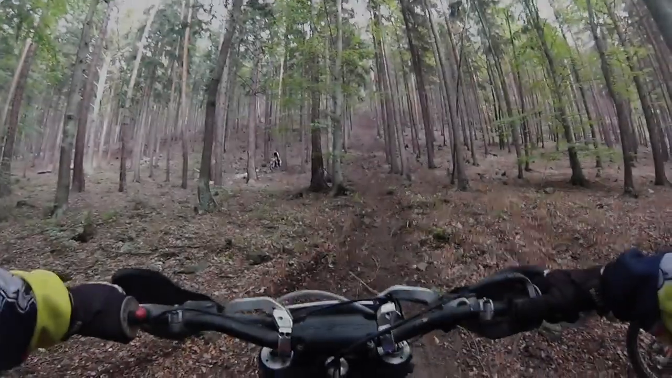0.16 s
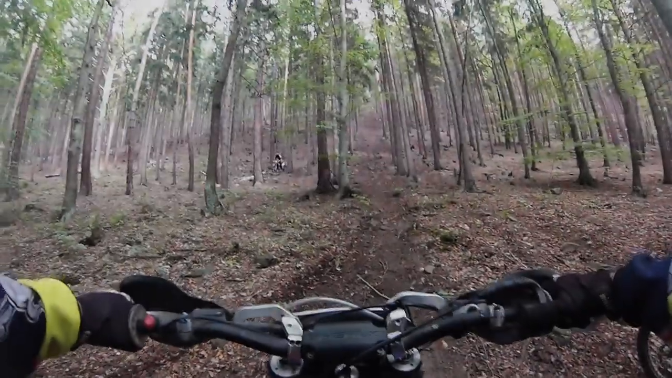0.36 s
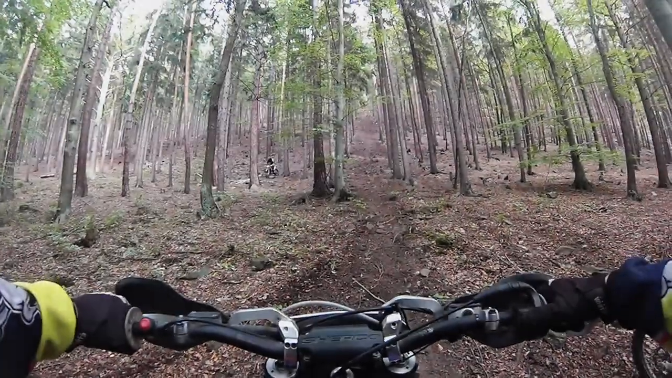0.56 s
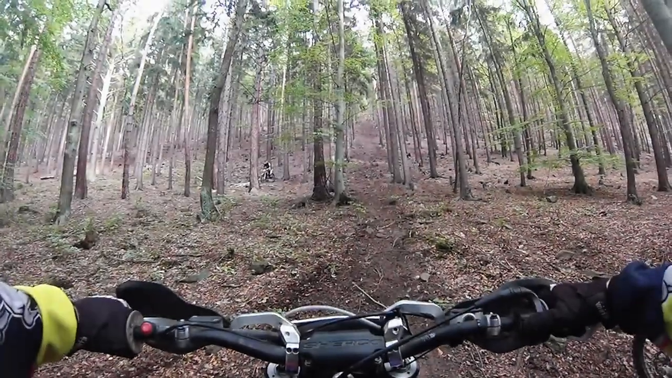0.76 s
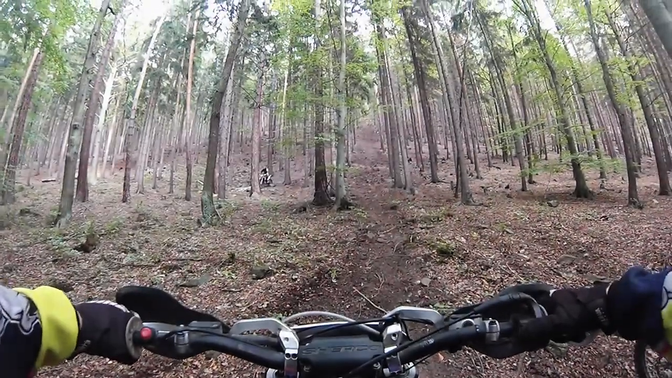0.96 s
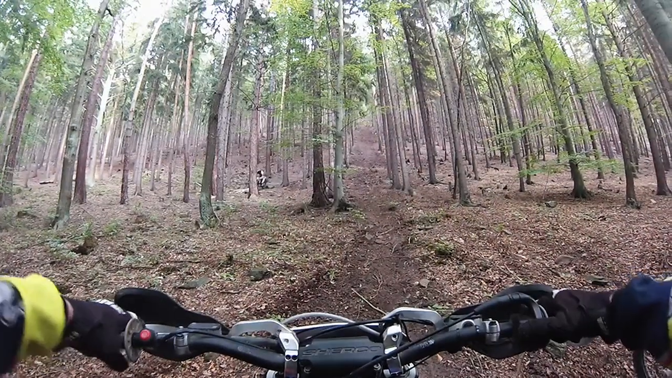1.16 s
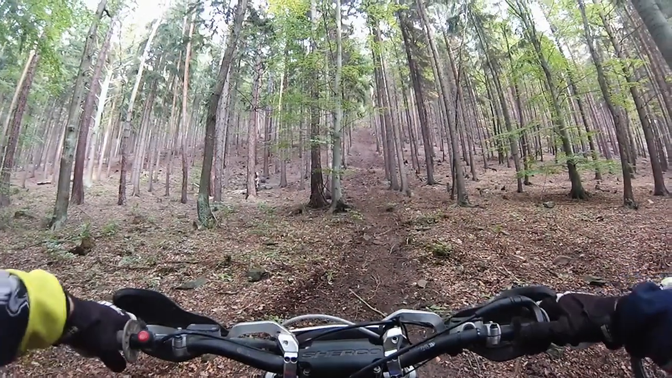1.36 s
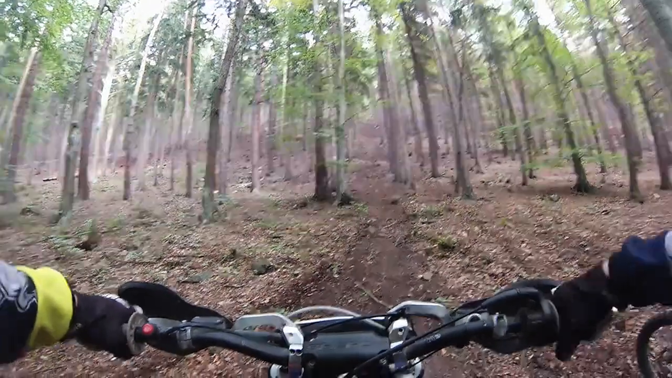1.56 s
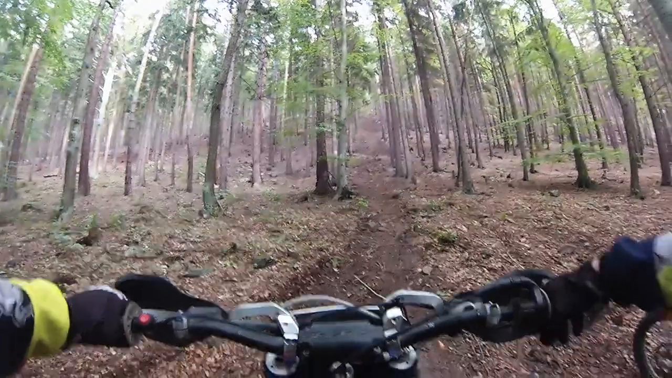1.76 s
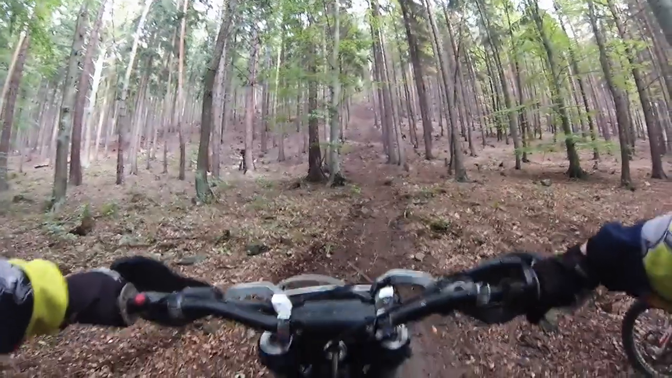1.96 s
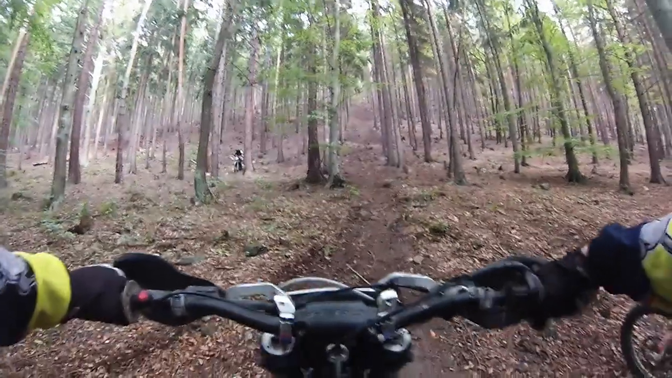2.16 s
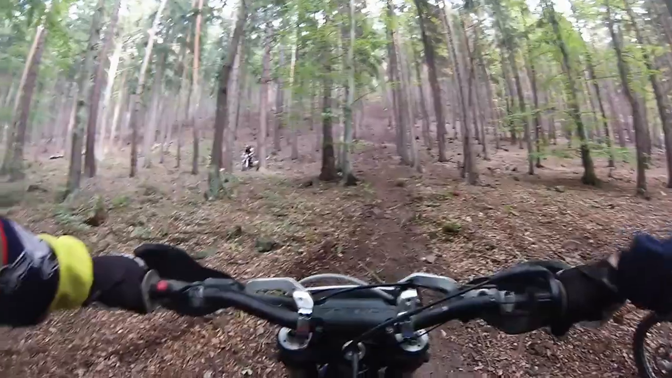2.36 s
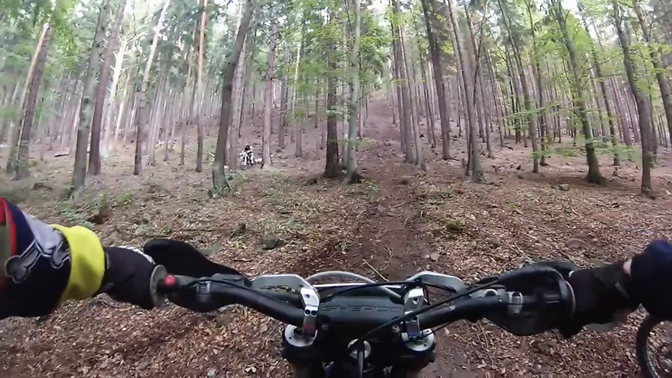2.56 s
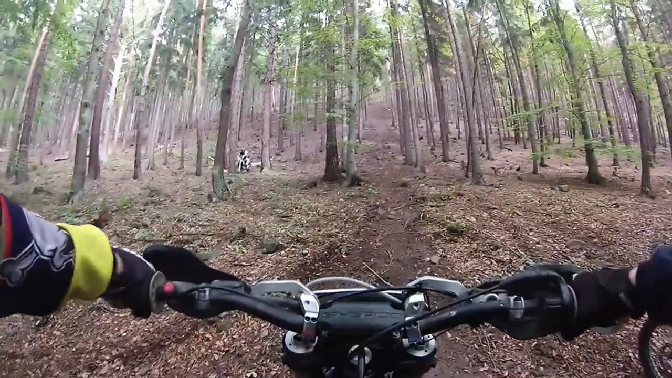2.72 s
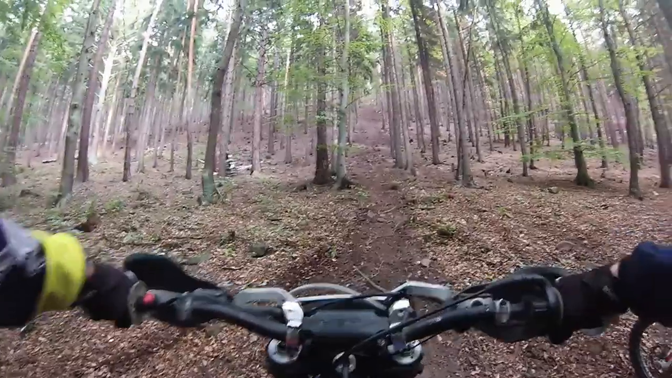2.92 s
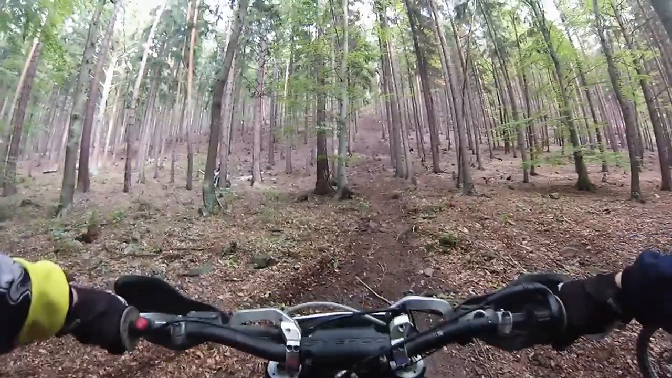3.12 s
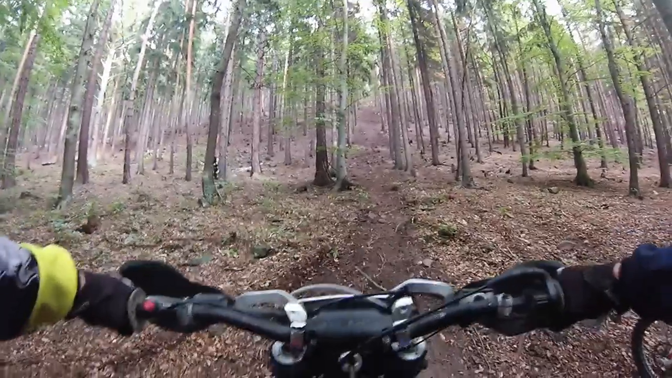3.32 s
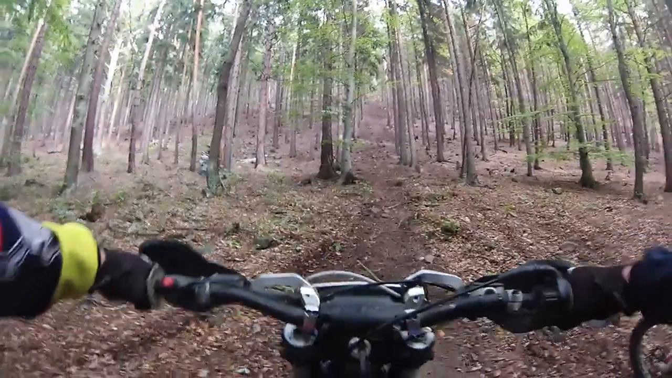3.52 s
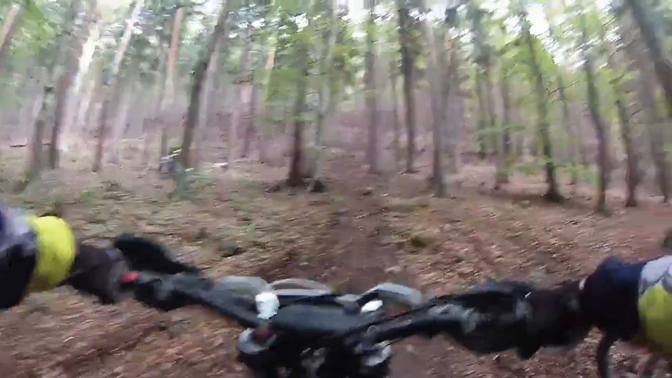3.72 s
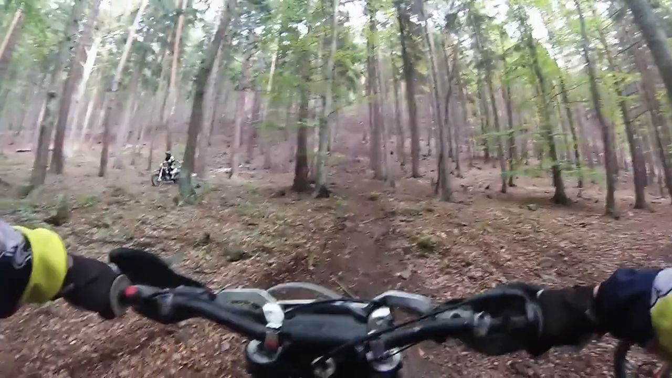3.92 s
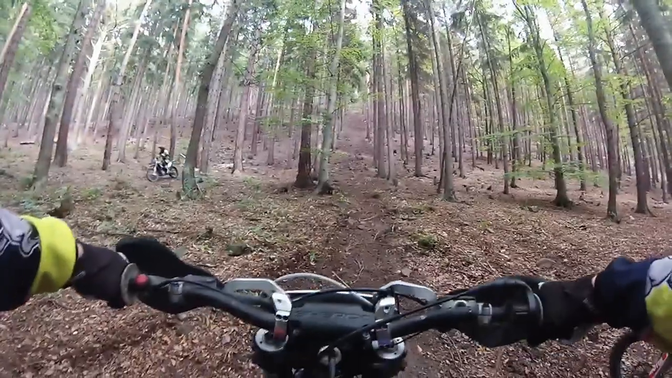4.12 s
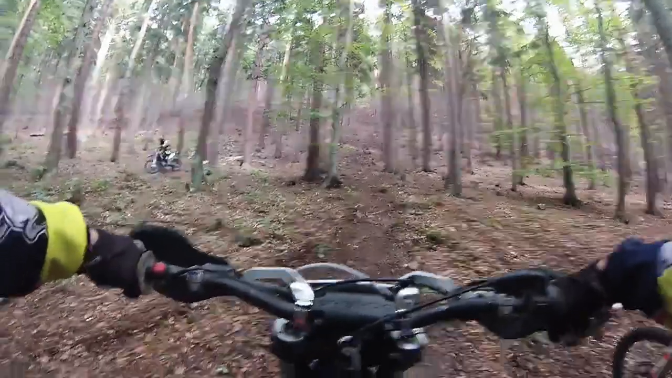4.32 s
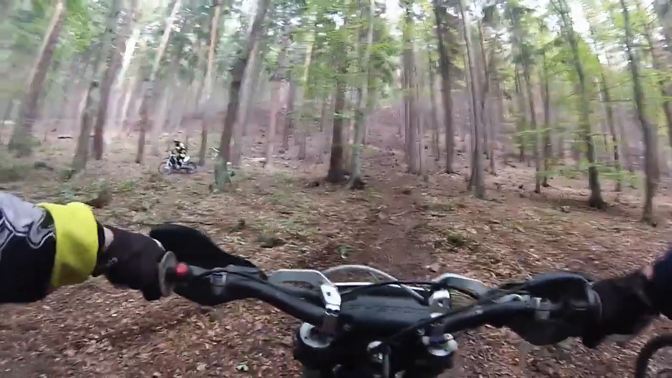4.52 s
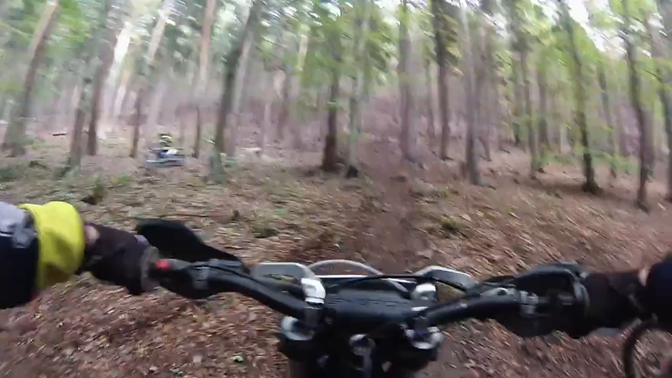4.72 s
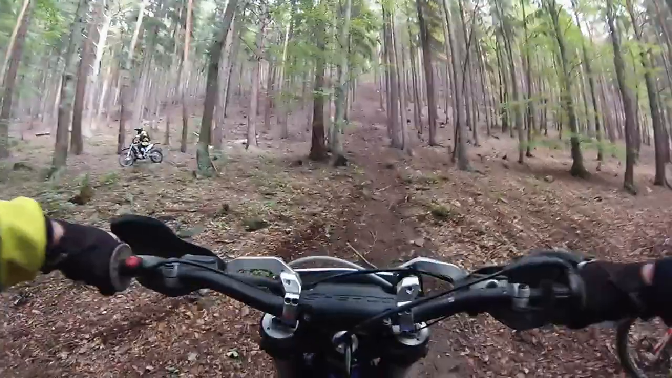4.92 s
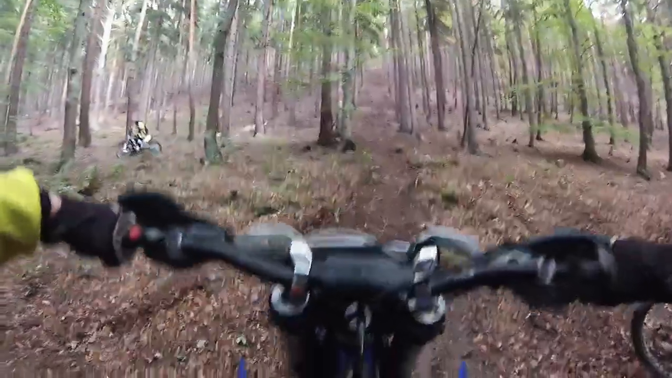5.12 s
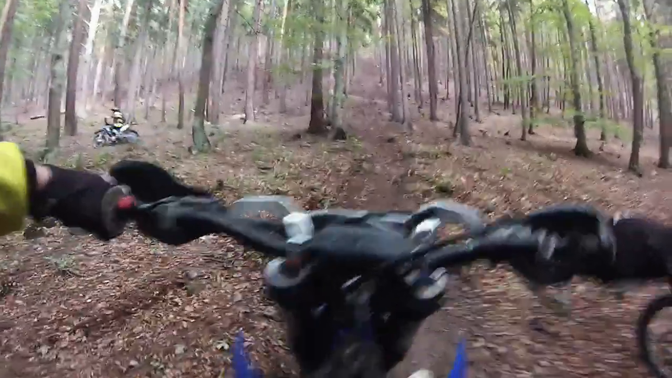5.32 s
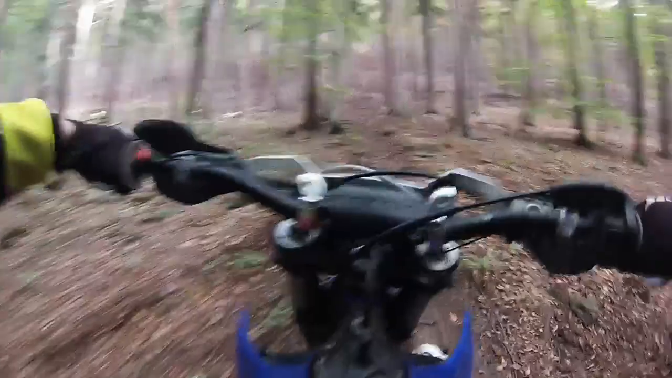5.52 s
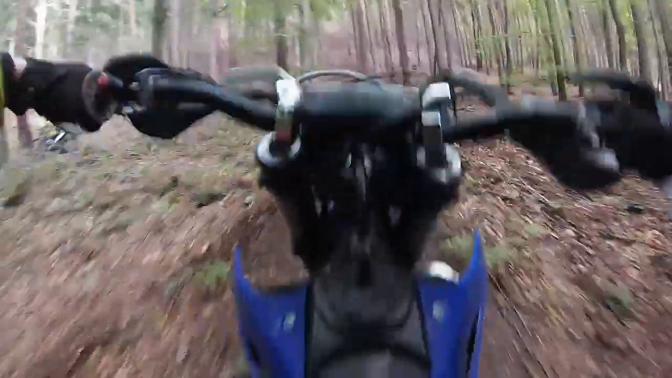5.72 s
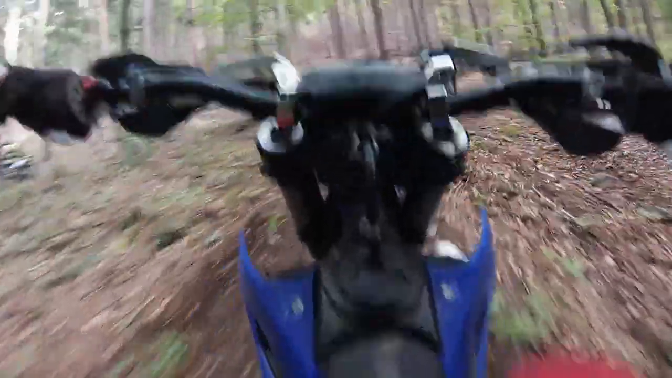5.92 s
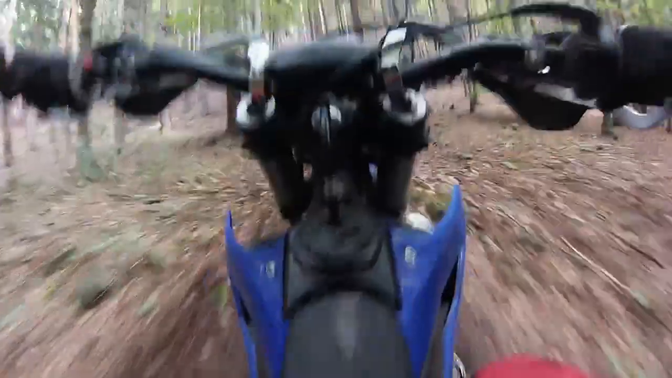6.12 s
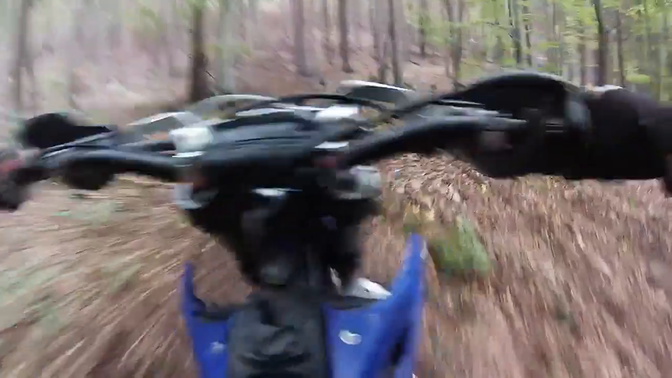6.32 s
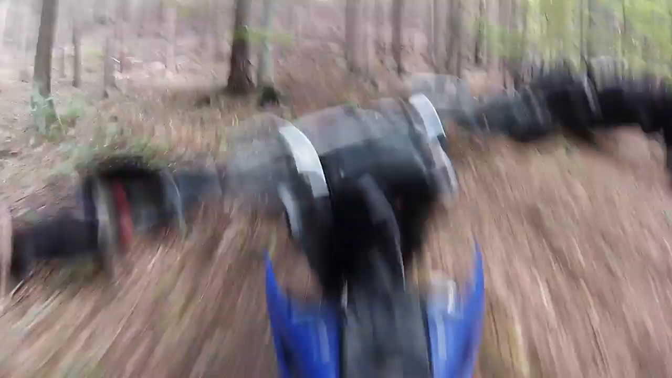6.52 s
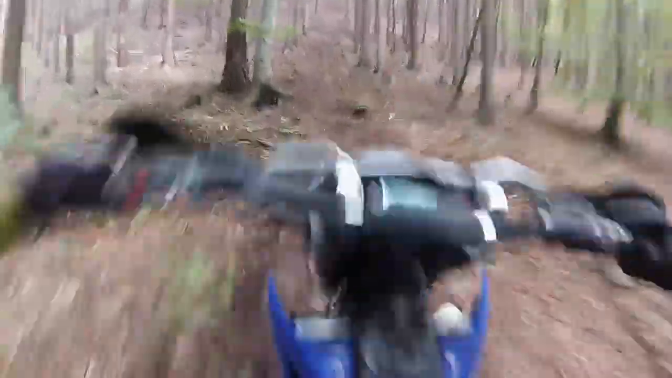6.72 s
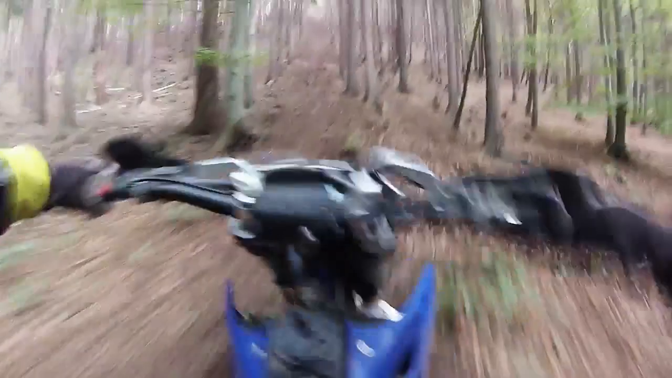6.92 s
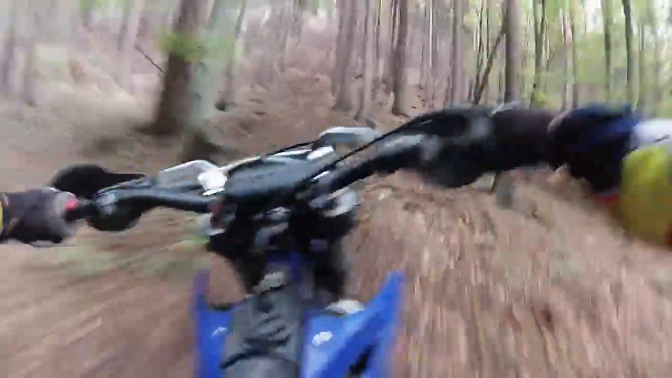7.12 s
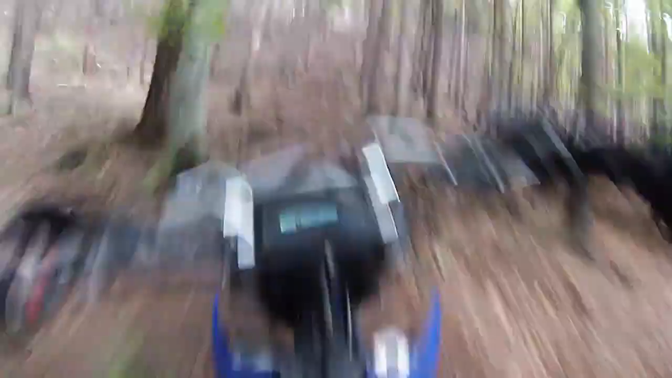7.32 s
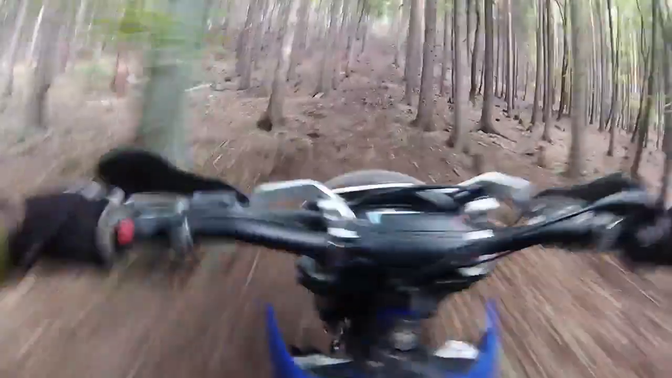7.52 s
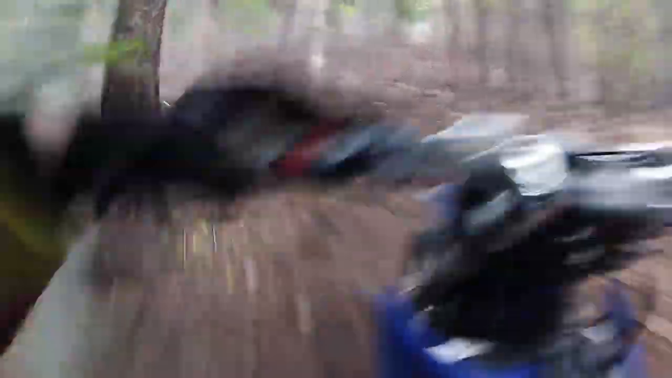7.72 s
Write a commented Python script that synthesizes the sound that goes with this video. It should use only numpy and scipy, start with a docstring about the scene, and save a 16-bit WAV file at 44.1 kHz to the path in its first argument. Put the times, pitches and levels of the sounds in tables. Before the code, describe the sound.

For the first second, gloves and sleeves rustle softly in still forest air. At about 1.1 seconds a starter grinds briefly, and at 1.25 a single-cylinder four-stroke dirt bike catches and revs up with a hollow bark, a pulsing exhaust drone and metallic clatter. As the revs sink, first gear clunks in at 2 seconds. Short, stumbling throttle blips follow at about 2.5, 2.7, 3.3 and 4.7 seconds, with sharp firing cracks and gearbox knocks, the engine slowing between them. From 5 seconds the throttle opens wide for a hill climb. The engine turns fuller and raspier, its pitch swinging quickly up and down, peaking near 5.7 and sagging deeply at 6.5. From about 7.2 it holds high, wavering revs until the end, near 8 seconds. The bike is close throughout, heard from the rider's helmet, with faint short echoes from the trees.

```python
"""A single-cylinder four-stroke dirt bike in a forest, heard from the rider's helmet.
Gloves and sleeves rustle, the starter grinds, and at 1.25 s the engine catches and is blipped:
gulps of air bark in the airbox, exhaust pulses drone in the pipe, the metal clatters along.
First gear clunks in at 2 s and a few stumbling blips follow. From 5 s the bike climbs a hill on
an open throttle, its revs swinging as the tyre slips and grips, with faint echoes from the trees."""
import sys
import numpy as np
from scipy import signal
from scipy.fft import rfft, irfft
from scipy.io import wavfile
from scipy.ndimage import uniform_filter1d

SR = 44100
rng = np.random.default_rng(int(sys.argv[2]) if len(sys.argv) > 2 else 0)


def transcribe(signal):
    """Save signal, clipped to [-1, 1], as a 16-bit WAV file at the path in sys.argv[1]."""
    frames = np.atleast_2d(signal).T
    limited = np.clip(frames, -1, 1)
    pcm = np.round(limited * 32767).astype(np.int16)
    wavfile.write(sys.argv[1], SR, pcm)


N = 347067
T = np.arange(N) / SR
IDLE_HZ = 44.7  # engine speeds are in firings per second

# The rasp swells and sinks on top of speed and throttle. Each row: time in seconds, swell in dB.
RASP_SWELL = [(1.3, 3.5), (1.5, 1.5), (1.75, 2), (2.1, -1), (3.1, -2), (3.7, 0.5), (4.12, -4.5), (4.6, -1),
              (5.05, 1), (5.23, 5.5), (5.45, 0), (5.68, 1.5), (6.11, -1), (6.27, 1.5), (6.45, -0.5),
              (6.85, -2.5), (7.35, -2.5), (7.8, 0.5)]

def engine():
    """One cylinder drives every voice; each follows speed, throttle and its own share of the swell."""
    hz, throttle, swell_db = engine_speed(), throttle_opening(), curve(RASP_SWELL)
    turns = crank_turns(hz)
    load = .17 + .68 * throttle  # cylinder filling, 0-1
    flow = np.clip((uniform_filter1d(hz, size=SR // 2) - 60) / 12, 0, 1)  # sustained airflow, 0-1
    stumble = load * np.clip((62.8 - hz) / 12, 0, 1) * (1 - flow)  # lugging at low revs
    uneven_db = .85 + 5.5 * stumble
    pulses = firings(turns, uneven_db)
    octaves = np.log2(np.maximum(hz, IDLE_HZ) / 80)

    def fader(shut, wide):
        """Gain between shut and wide-open throttle; each pair is dB at 80 Hz, dB per octave of speed."""
        return amp((1 - throttle) * (shut[0] + shut[1] * octaves)
                   + throttle * (wide[0] + wide[1] * octaves))

    bark = fader((-42, 18), (-14.2, 0)) * airbox_bark(pulses, turns, hz, uneven_db, flow, load)
    thump = fader((-31.5, 13), (-31, 24)) * firing_thump(pulses)
    drone = fader((-31.3, 14.5), (-28.3, 14.5)) * exhaust_drone(turns, hz, uneven_db)
    rumble = fader((-35, 16.5), (-37.5, 1.5)) * crankcase_rumble()
    sizzle = fader((-75, 28), (-45, 0)) * throttle_sizzle(flow)
    metal = fader((-38.5, 13.5), (-34.5, 14)) * metal_clatter(pulses, turns, hz, load)
    low = bark * amp(-.49 * throttle * swell_db) + thump * amp(throttle * swell_db)
    mid = (drone + rumble) * amp(.58 * swell_db)
    high = metal * amp(swell_db) + sizzle * amp(.65 * swell_db)
    running = np.clip((T - 1.245) / .01, 0, 1)
    return running * (low + mid + high)

# Flicks of the wrist. Each row: start in seconds, release in seconds, roll-on time in seconds,
# opening from 0 to 1, top speed in firings per second.
BLIPS = [(1.24, 1.29, 0.0091, .6, 24), (1.23, 1.49, .2, .97, 73.2), (2.48, 2.614, .06, .75, 56),
         (2.705, 2.868, .065, .69, 58.5), (3.245, 3.41, 0.031, .59, 52), (3.31, 3.625, 0.17, .88, 70),
         (4.67, 4.848, 0.054, .72, 56)]
# Throttle on the hill. Each row: time in seconds, opening from 0 to 1.
CLIMB_THROTTLE = [(4.95, 0.44), (5.01, 0.79), (5.11, 0.94), (5.25, 0.73), (5.39, 1), (7.87, 1)]

def throttle_opening():
    """The slide rests part open, springs back after each blip and is held wide on the hill."""
    opening = curve(CLIMB_THROTTLE)
    for opened, shut, rise, amount, _ in BLIPS:
        roll_on = np.clip((T - opened) / rise, 0, 1)
        release = np.exp(-np.maximum(T - shut, 0) / .05)
        opening = np.maximum(opening, amount * roll_on * release)
    return opening

# Revs as the rear tyre slips and grips. Each row: time in seconds, firings per second.
CLIMB_REVS = [(4.969, 52.6), (5.065, 69.9), (5.255, 83.7), (5.486, 67.6), (5.646, 105.0), (5.767, 89.2),
              (5.889, 100.5), (6.126, 75.5), (6.263, 93.9), (6.413, 67.6), (6.505, 54.0), (6.589, 71.9),
              (6.66, 87.2), (6.833, 69.1), (6.98, 87.2), (7.162, 100.4), (7.327, 96.3), (7.402, 101.8),
              (7.5, 99.0), (7.608, 103.6), (7.729, 101.2), (7.803, 104.2)]

def engine_speed(cranking_hz=21.95, friction_hz_per_s=29):
    """Each blip spins the flywheel up and friction slows it; on the hill it swings with the grip."""
    hz = np.full(N, cranking_hz)
    for opened, shut, _, _, top_hz in BLIPS:
        start_hz = hz[int(opened * SR)]
        top_s = shut + .06  # the flywheel gains speed a little longer
        rise = np.sin(np.pi / 2 * np.clip((T - opened) / (top_s - opened), 0, 1)) ** 2
        blip = start_hz + (top_hz - start_hz) * rise - friction_hz_per_s * np.maximum(T - top_s, 0)
        hz = np.where(T < opened, hz, blip)
    return np.where(T < CLIMB_REVS[0][0], hz, rounded(CLIMB_REVS))

# Hard firings as the engine stumbles. Each row: time in seconds, pulse accent in dB,
# relative level of its crack in dB.
HARD_FIRINGS = [(1.26, 1, -51), (2.552, 6.5, -35), (2.593, 1, -37.5), (2.612, -3, -41), (2.758, 4, -40),
                (2.793, 4, -39.5), (2.813, 0, -42), (2.845, 5, -38), (3.283, 6, -38), (3.324, 7, -37.5),
                (3.365, 2, -38.5), (3.405, 7, -39), (4.731, 4.5, -37), (4.77, 5, -37), (4.835, 2.5, -39),
                (4.91, 5, -40.5), (4.974, 4.5, -37.5), (5.01, 3, -37.5), (6.424, -1, -49), (6.559, 3, -47)]
GULP_LEAD_S = .005  # the airbox takes this long to swell

def firings(turns, uneven_db, delay_s=0, jitter_s_per_db=.00004):
    """One pulse per cycle; each differs in strength and timing, and a few fire hard."""
    at = np.flatnonzero(np.diff(np.floor(turns)) > 0)
    strength, late = rng.standard_normal((1000, 2))[:len(at)].T
    db = uneven_db[at] * strength
    for s, accent_db, _ in HARD_FIRINGS:
        db[np.argmin(abs(T[at] - s + GULP_LEAD_S - delay_s))] = accent_db
    jitter = (late * jitter_s_per_db * uneven_db[at] * SR).astype(int)
    pulses = np.zeros(N)
    pulses[np.clip(at + jitter, 0, N - 1)] = -amp(db)
    return pulses

def crank_turns(hz):
    """Engine cycles counted from the speed; the crank hurries or lags to meet each hard firing."""
    turns = np.cumsum(hz) / SR
    hard_s = np.transpose(HARD_FIRINGS)[0] - GULP_LEAD_S
    ahead = np.unwrap(2 * np.pi * (np.interp(hard_s, T, turns) % 1)) / (2 * np.pi)
    return turns - np.interp(T, hard_s, ahead)

def firing_cracks():
    """A sharp crack tops each hard firing."""
    hits = [(s - .004, db + 1, .019, 1) for s, _, db in HARD_FIRINGS]
    return bursts(hits, KNOCK_EQ, rise_s=.001)

# The airbox's hollow voice at low and high revs. Each row: frequency in Hz, relative level in dB.
AIRBOX_SLOW_EQ = [(40, -43), (110, -30), (165, -10), (205, -1), (242, 5.5), (290, 1.5), (345, -17.5),
                  (385, -6), (425, -9), (470, -28), (560, -14), (700, -26), (1200, -56.5)]
AIRBOX_FAST_EQ = [(40, -55), (110, -24.5), (165, -10.5), (205, -3.5), (250, -1), (275, 3.5), (298, 5.5),
                  (335, -6.5), (365, -5), (400, -2), (450, -8), (510, -15.5), (700, -40.5), (1200, -70)]

def airbox_bark(pulses, turns, hz, uneven_db, flow, load):
    """Gulps of air ring the airbox; its voice grows with load and rises with sustained flow."""
    gulps = turbulent(pulses, turns, hz, share=.14 + .071 * uneven_db)
    voice = (1 - flow) * colour(gulps, AIRBOX_SLOW_EQ) + flow * colour(gulps, AIRBOX_FAST_EQ)
    return np.tanh(5 * load) * steady(voice)

# The engine's bottom end. Each row: frequency in Hz, relative level in dB.
THUMP_EQ = [(15, -39), (35, -25), (52, -9), (70, -8), (100, 4.5), (135, -7), (175, -12.5), (300, -37),
            (600, -108)]

def firing_thump(pulses):
    """Each firing lands as a bass thud."""
    return steady(colour(pulses, THUMP_EQ))

# The pipe's throaty midrange. Each row: frequency in Hz, relative level in dB.
PIPE_EQ = [(60, -35), (130, -12), (220, -3), (370, 1), (470, -3.5), (560, -1.5), (640, -2), (700, 3.5),
           (755, -1.5), (840, -2), (950, -23.5), (1300, -19), (2000, -23), (6000, -66)]

def exhaust_drone(turns, hz, uneven_db):
    """The exhaust valve opens later in the cycle, and its pulses ring the pipe."""
    valve_turns = turns - .42
    pulses = firings(valve_turns, uneven_db, delay_s=.008)
    gas = turbulent(pulses, valve_turns, hz, share=.1 + .24 * uneven_db)
    return steady(colour(disperse(gas, decay_s=.0053), PIPE_EQ))

# Valve tick, gear whirr and gas rasp. Each row: frequency in Hz, relative level in dB.
TICK_EQ = [(500, -40), (1100, -16), (1600, -9), (1880, 3), (2050, -2), (2350, -14), (3050, -7), (3700, -14),
           (4300, -8), (5300, -7), (6200, -22), (8000, -38), (15000, -58)]
WHIRR_EQ = [(500, -14.5), (900, -20.5), (1020, 2.5), (1210, 5), (1400, -4.5), (1810, 1), (2370, -6.5),
            (3070, -4), (3710, -7.5), (4030, -1), (5280, -5), (6160, -13), (7790, -24), (15000, -55)]
GAS_EQ = [(500, -23.5), (950, -5.5), (1150, -6), (1480, -4), (1780, -6), (2370, -11), (2930, -4),
          (3710, -8), (5220, -6.5), (6160, -15.5), (7790, -25), (12900, -27.5), (14000, -37), (15200, -80)]
# The ring of cylinder head and cases. Each row: frequency in Hz, width in Hz, peak gain in dB.
HEAD_MODES = [(1442, 230, 0.5), (1900, 41, -26), (2887, 36, 3.5), (3145, 63, 1), (3480, 19, -4),
              (4275, 65, -1), (5290, 126, 3)]

def metal_clatter(pulses, turns, hz, load):
    """Valves tick, gears whirr and gas tears through the ports; all of it rings the metal."""
    # valves seat between the gulps, and stand out at low speed
    seating = puff(turns - .6, width=.05) * rng.standard_normal(N)
    tick_db = -2.5 - 11.1 * np.log2(np.maximum(hz / IDLE_HZ, 1))
    ticks = amp(tick_db) * unit_rms(colour(seating, TICK_EQ))
    whirr = amp(-.6) * np.sqrt(1 - load) * noise(WHIRR_EQ)
    # under load the gas comes in uneven bursts, and the pipe wall buzzes
    grit = amp(2 * unit_rms(uniform_filter1d(rng.standard_normal(N), size=120)))
    surge = 1 + .18 * puff(turns + .23, width=.17)
    rasp = amp(-4) * noise(GAS_EQ) * unit_rms(grit * surge)
    buzz = amp(-.5) * steady(colour(disperse(pulses, decay_s=.0051), GAS_EQ, tilt_db=-1.5))
    metal = ticks + whirr + load * rasp + load ** 2 * buzz
    return metal + ring(metal, HEAD_MODES)

# The dark body of the cases. Each row: frequency in Hz, relative level in dB.
CRANKCASE_EQ = [(25, -7), (70, 3.5), (150, -10), (280, -1), (480, 2.5), (750, 8), (860, -14), (980, -31),
                (1600, -36)]

def crankcase_rumble():
    """The crankcases lay a bed of low noise under the firings."""
    return noise(CRANKCASE_EQ)

# A thin, airy top. Each row: frequency in Hz, relative level in dB.
SIZZLE_EQ = [(3000, -30), (7000, 8), (9000, -8), (13000, -3), (15000, -17)]

def throttle_sizzle(flow):
    """Air hisses past the throttle slide, fading once the flow is sustained."""
    return (1 - flow) * noise(SIZZLE_EQ)

# The starter's grind. Each row: frequency in Hz, relative level in dB.
STARTER_EQ = [(35, -73), (60, -49), (212, -2.5), (482, -1.5), (589, 2.5), (938, -9), (1020, -12),
              (1460, -16), (3100, -14.5), (3710, -17.5), (5280, -18), (6040, -31), (12000, -55),
              (15600, -81), (22000, -120)]
# Its bite and fade. Each row: time in seconds, level in dB.
STARTER_LEVEL = [(1.11, -77), (1.128, -58), (1.133, -40), (1.15, -41.5), (1.172, -37), (1.2, -44.5),
                 (1.24, -46.5), (1.3, -54), (1.36, -61)]

def starter(tooth_hz=150):
    """The starter gears engage and grind until the engine catches."""
    engaged = (T > STARTER_LEVEL[0][0]) * (T < STARTER_LEVEL[-1][0])
    teeth = 1 + .233 * np.sin(2 * np.pi * tooth_hz * T)
    return amp(curve(STARTER_LEVEL)) * engaged * noise(STARTER_EQ) * teeth

# A hard metal clunk. Each row: frequency in Hz, relative level in dB.
KNOCK_EQ = [(88, -55), (150, -7.5), (252, -4), (612, -14.5), (972, -18), (1640, -14.5), (1870, -13),
            (2310, -26), (3090, -13), (3340, -17), (5400, -13.5), (7790, -32.5), (15000, -34.5)]
# The clunks. Each row: start in seconds, level in dB, decay in seconds, brightness in dB per octave.
KNOCKS = [(1.13, -44, 0.0073, -6), (2.017, -17, 0.0083, -2.5), (2.029, -26, 0.013, -2),
          (2.213, -25, 0.016, -2), (2.599, -19, 0.018, -5), (2.642, -39, 0.022, 3),
          (2.853, -33.5, 0.025, -2), (2.91, -39, 0.018, 2), (3.003, -41.5, 0.011, 6),
          (3.355, -18.5, 0.0079, -5.5), (3.415, -32, 0.0068, -0.5), (3.451, -19.5, 0.013, -4.5),
          (3.832, -30, 0.021, -1), (4.806, -23.5, 0.016, -5)]

def drivetrain_knocks():
    """Starter drive, gearbox and chain knock as they engage."""
    return bursts(KNOCKS, KNOCK_EQ, rise_s=.0027)

# A soft scuff of riding gear. Each row: frequency in Hz, relative level in dB.
RUSTLE_EQ = [(35, -56), (60, -20), (139, -17), (242, -8), (719, 3), (938, -5.5), (1820, -5.5), (2330, -11),
             (5400, -14.5), (6040, -26), (12000, -63), (15600, -89), (22000, -120)]
# The scuffs. Each row: start in seconds, level in dB, decay in seconds, brightness in dB per octave.
SCUFFS = [(.008, -58.5, .018, 7), (.062, -60, .03, 3.5), (.089, -49, .01, -1), (.26, -53, 0.034, 2),
          (.288, -54, .017, 2), (.399, -48.5, .023, -10), (.53, -52.5, 0.014, -1.5), (.587, -63, .029, 5),
          (.658, -50, 0.017, 1), (.774, -45.5, .0068, 8.5), (.86, -52.5, 0.054, -10.5),
          (.896, -59.5, .016, 3), (1.025, -62, .032, 4)]

def rider_rustle():
    """Gloves and sleeves brush the levers before the start."""
    return bursts(SCUFFS, RUSTLE_EQ, rise_s=.0032)

def tree_echoes(x, t60_s=.45, count=500, size=22050):
    """Sparse dying reflections from ground and trunks."""
    at = rng.integers(size // 100, size, count)
    taps = np.zeros(size)
    taps[at] = rng.choice([-1, 1], count) * amp(-60 * at / SR / t60_s)
    return signal.oaconvolve(x, taps / np.linalg.norm(taps))[:N]

# The forest's hush. Each row: frequency in Hz, relative level in dB.
FOREST_EQ = [(15, -31), (25, 11.5), (172, -5), (691, -1.5), (952, -14), (1580, -6.5), (2370, -40),
             (2930, -6), (3350, -19), (5280, -13), (6200, -23), (12100, -33), (15000, -69)]

def forest_air():
    """Still air, a faint and even bed of noise."""
    return amp(-68) * noise(FOREST_EQ)

def turbulent(pulses, turns, hz, share):
    """Each pulse drags a puff of eddies, so no two cycles are alike."""
    return pulses + share * np.sqrt(hz / SR) * puff(turns, width=.15) * rng.standard_normal(N)

def puff(turns, width):
    """A swell once a cycle: quick rise, slower fall."""
    age = (turns % 1) / width
    return unit_rms(age * np.exp(-age))

def disperse(x, decay_s, size=800):
    """Short paths through pipe and silencer smear each pulse over a few milliseconds."""
    paths = rfft(rng.standard_normal(size) * np.exp(-np.arange(size) / SR / decay_s), 4 * size)
    nearly_flat = paths / abs(paths) ** .8
    return signal.oaconvolve(x, irfft(nearly_flat)[:size])[:len(x)]

def bursts(hits, eq, rise_s, size=9000):
    """A track of short noise hits, each with a fast attack and its own decay and brightness."""
    track, t = np.zeros(N), np.arange(size) / SR
    for s, db, decay_s, tilt_db in hits:
        envelope = np.minimum(t / rise_s, 1) * np.exp(-np.maximum(t - rise_s, 0) / decay_s)
        hit = amp(db) * envelope * unit_rms(colour(rng.standard_normal(size), eq, tilt_db))
        slot = track[round(s * SR):][:size]
        slot += hit[:len(slot)]
    return track

def ring(x, modes, size=3000):
    """Damped resonances driven by x."""
    t = np.arange(size) / SR
    response = sum(amp(db) * width * np.exp(-np.pi * width * t) * np.cos(2 * np.pi * hz * t)
                   for hz, width, db in modes)
    return 2 * np.pi / SR * signal.oaconvolve(x, response)[:N]

def colour(x, eq, tilt_db=0, size=4096):
    """Minimum-phase EQ, tilted by tilt_db per octave, with its peak at unity gain."""
    hz, db = np.transpose(eq)
    octave = np.log2(abs(np.fft.fftfreq(size, 1 / SR)) + 1)
    db = np.interp(octave, np.log2(hz + 1), db) + tilt_db * octave
    log_gain = np.log(amp(np.maximum(db - db.max(), -100)))
    response = np.fft.ifft(np.exp(np.conj(signal.hilbert(log_gain)))).real
    return signal.oaconvolve(x, response[:size // 2])[:len(x)]

def noise(eq):
    return unit_rms(colour(rng.standard_normal(N), eq))

def steady(x, size=2600):
    """Holds the loudness at one over a few engine cycles."""
    power = uniform_filter1d(uniform_filter1d(x ** 2, size), size)
    return x / np.sqrt(abs(power) + 1e-4 * np.mean(x ** 2))

def curve(rows):
    """Straight ramps through (seconds, value) rows."""
    return np.interp(T, *np.transpose(rows))

def rounded(rows):
    """A smooth curve through (seconds, value) rows that levels out at each crest and trough."""
    s, value = np.transpose(rows)
    slope = np.diff(value) / np.diff(s)
    before, after = slope[:-1], slope[1:]
    tangent = np.r_[0, 2 * np.maximum(before * after, 0) / (before + after + 1e-9), 0]
    place = np.interp(T, s, np.arange(len(s)))
    k = np.minimum(place.astype(int), len(s) - 2)
    u = place - k
    bend = (1 - u) * (tangent[k] - slope[k]) - u * (tangent[k + 1] - slope[k])
    return value[k] + np.diff(s)[k] * u * (slope[k] + (1 - u) * bend)

def amp(db):
    return 10 ** (np.asarray(db) / 20)

def unit_rms(x):
    return x / np.sqrt(np.mean(x ** 2) + 1e-20)

def scene():
    """The bike close by, faint echoes from the trees, and still forest air, in mono."""
    bike = engine() + starter() + firing_cracks() + drivetrain_knocks() + rider_rustle()
    return (bike + amp(-21) * tree_echoes(bike) + forest_air())[None]

def record(dry):
    """A steep low-pass trims the very top."""
    lowpass = signal.firwin(1023, cutoff=15250, window=("kaiser", 9), fs=SR)
    return signal.oaconvolve(dry, lowpass[None], "same")

dry = scene()
out = record(dry)
transcribe(out)
```